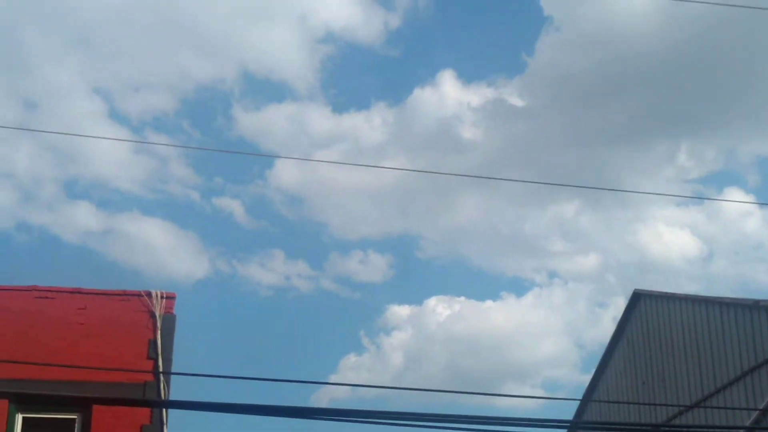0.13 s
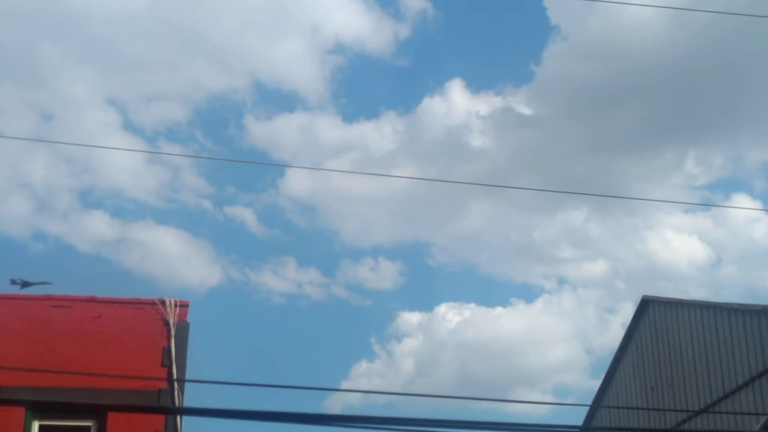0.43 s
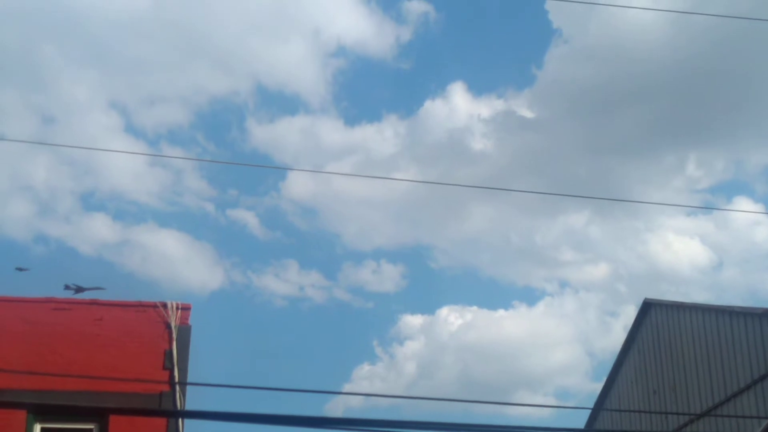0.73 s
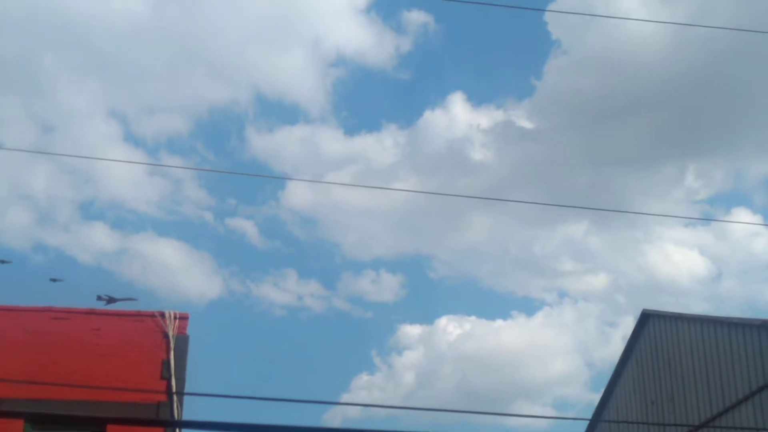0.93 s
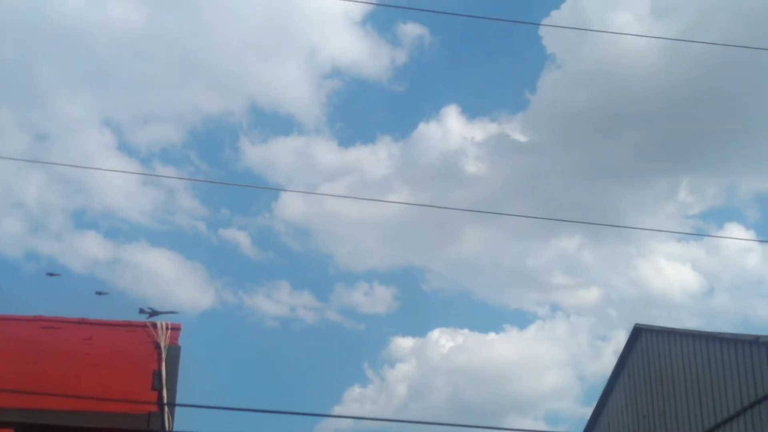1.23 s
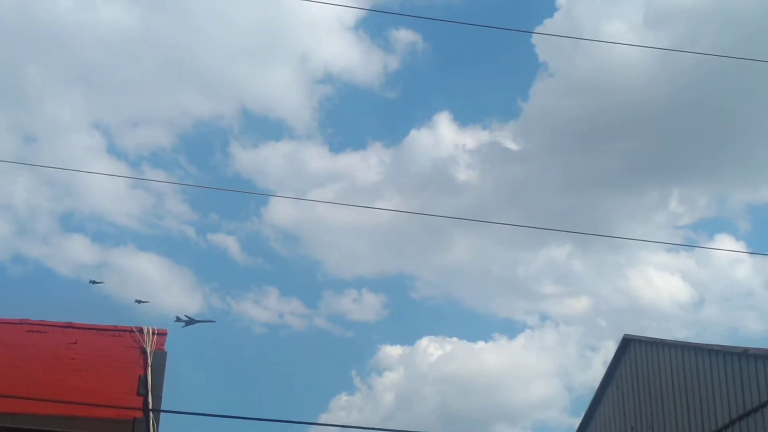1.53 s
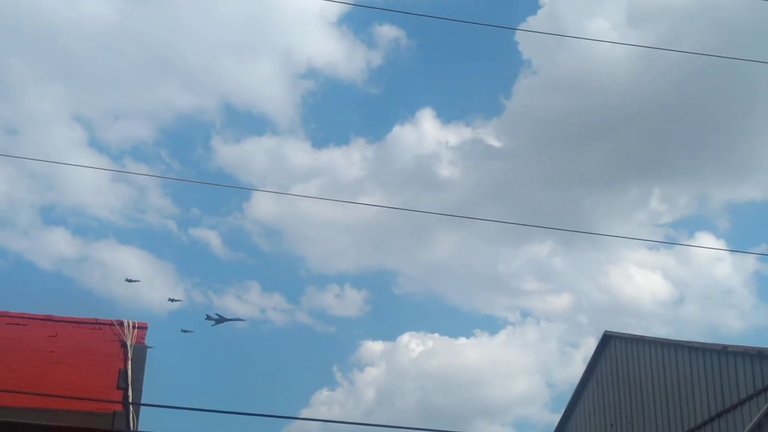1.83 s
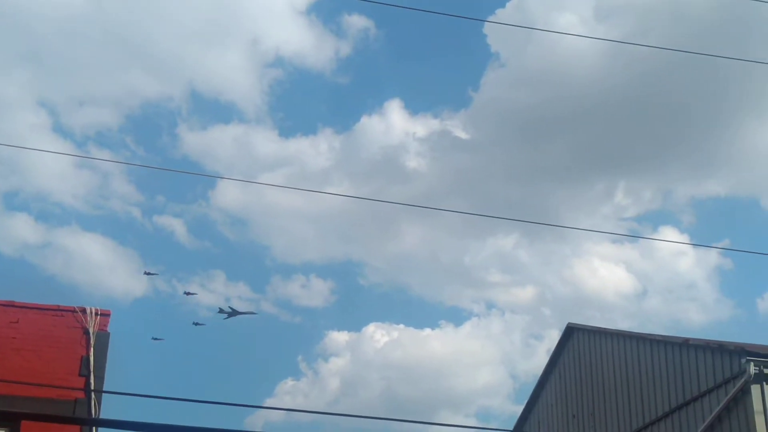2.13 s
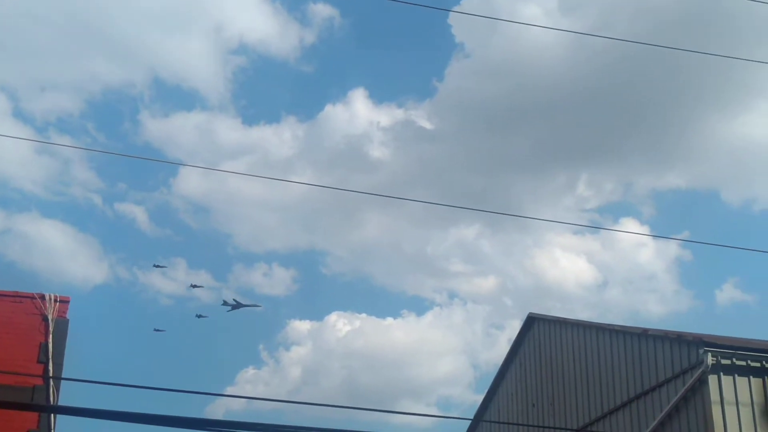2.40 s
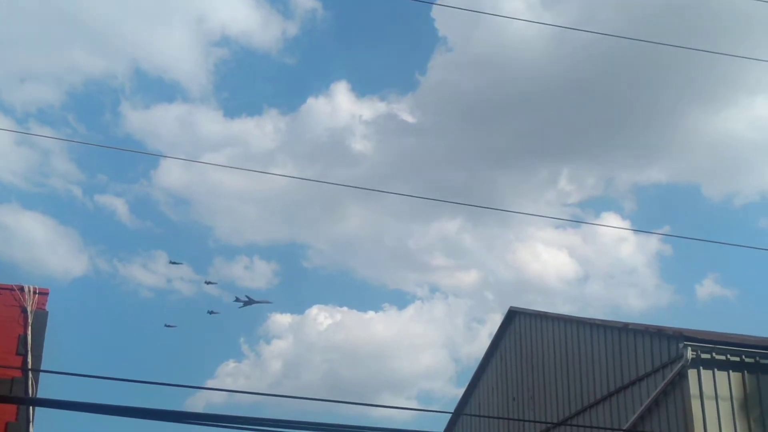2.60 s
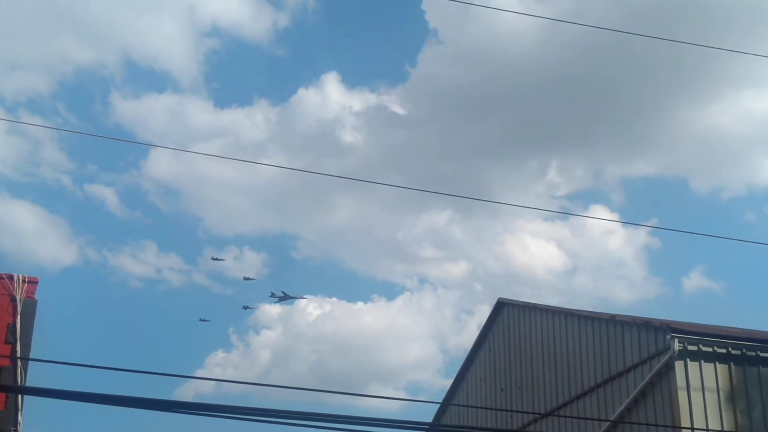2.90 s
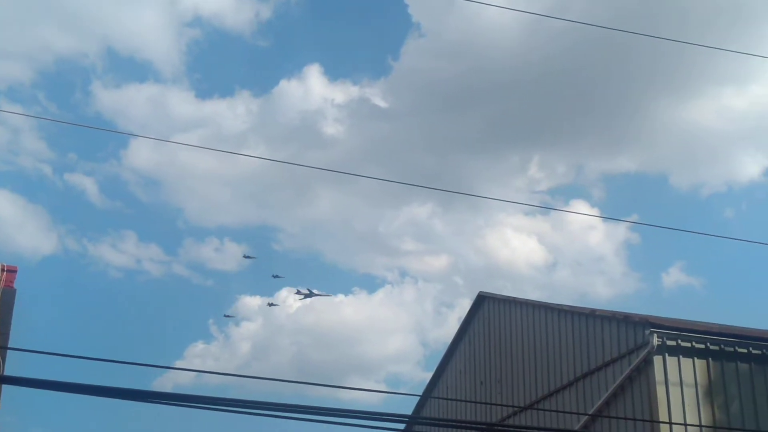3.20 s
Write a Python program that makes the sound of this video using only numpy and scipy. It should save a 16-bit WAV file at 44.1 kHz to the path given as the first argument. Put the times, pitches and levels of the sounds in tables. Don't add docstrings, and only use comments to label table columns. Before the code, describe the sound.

Jet aircraft rumble and roar some way off, growing unevenly stronger, with faint passing whines.

```python
import sys
import numpy as np
from scipy import signal
from scipy.fft import rfft, irfft
from scipy.io import wavfile

SR = 44100
rng = np.random.default_rng(int(sys.argv[2]) if len(sys.argv) > 2 else 0)


def generate_wav(signal):
    frames = np.transpose(np.atleast_2d(signal))
    scaled = np.clip(frames, -1, 1) * 32767
    pcm = np.round(scaled).astype(np.int16)
    wavfile.write(sys.argv[1], SR, pcm)


def level_to_linear(level):
    exponent = np.asarray(level, float) / 20
    return 10 ** exponent


N = 147735
T = np.arange(N) / SR
HZ = np.fft.rfftfreq(N, 1 / SR) + 1e-3


# (time [s], level [dB])
ROAR_LEVEL = [(0.03, -37.5), (0.15, -36), (0.33, -38.5), (0.51, -33), (0.71, -35), (0.84, -28),
              (0.98, -32.5), (1.0, -29), (1.15, -30.5), (1.84, -32.5), (2.03, -25.5), (2.04, -28),
              (2.38, -24.5), (2.42, -28.5), (2.48, -22.5), (2.65, -23.5), (2.67, -28.5), (3.32, -29.5)]


def roar_swell():
    level = np.interp(T, *np.transpose(ROAR_LEVEL))
    return level.mean(), level - level.mean()


# (frequency [Hz], density [dB per Hz])
ROAR_COLOUR = [(150, -7.5), (420, -1), (590, 2), (1100, -6.5), (2000, -6), (3000, -21.5), (4000, -38.5),
               (5600, -66)]
# (frequency [Hz], share of the swell [1])
SWELL_SHARE = [(300, 0.2), (700, 1.06), (1100, 1.27), (1600, 0.75), (3000, 0.76)]
# (centre [s], length [s], lift [dB])
CLEARINGS = [(.83, .12, 1), (1.972, 0.11, 2), (2.203, 0.076, 6.5), (2.45, 0.03, 4), (2.595, 0.04, 0),
             (2.89, 0.13, 3.5), (3.02, .1, 5.5), (3.118, 0.05, 4.5), (3.13, .2, 3), (3.27, .08, 2.5),
             (.5, .08, 1)]
# (frequency [Hz], share of the lift [1])
CLEARING_REACH = [(900, 0), (2000, 0.2), (3500, 1.5)]


def exhaust_roar(mean, swell, focus):
    clear = sum(db * bell(centre, length) ** 2 for centre, length, db in CLEARINGS)

    def band_level(hz):
        carried = mean + at_hz(SWELL_SHARE, hz) * swell
        return carried + at_hz(CLEARING_REACH, hz) * clear + focus(hz)

    return jet_noise(ROAR_COLOUR, band_level, flutter_db=1.0, patch_db=0.3)


# (frequency [Hz], density [dB per Hz])
RUMBLE_COLOUR = [(22, -59), (38, -37.5), (60, -5.5), (120, 0), (250, -0.5), (400, -11.5), (1000, -28),
                 (6000, -94)]
RUMBLE_DB, RUMBLE_FOLLOWS = -24, 0.13


def deep_rumble(swell, focus):
    def band_level(hz):
        return RUMBLE_DB + RUMBLE_FOLLOWS * swell + focus(hz)

    return jet_noise(RUMBLE_COLOUR, band_level, flutter_db=-0.06, patch_db=2.0)


# (frequency [Hz], share [1])
DIRECT_SHARE = [(60, 0.99), (250, 0.96), (600, 0.86), (1050, 0.44), (2000, 0.71), (3200, .55), (4500, 0.37)]


def jet_noise(colour, band_level, flutter_db, patch_db):
    white = rfft(rng.standard_normal((3, N)))
    share = np.clip(at_hz(DIRECT_SHARE, HZ), 0, 1)
    ports = at_ports(white[0], white[1:], share) * level_to_linear(at_hz(colour, HZ))
    ports = ports / np.sqrt(np.mean(irfft(ports, N) ** 2))
    together = flutter_db * drift(8.2)
    place = np.clip(2 * np.log2(HZ / 20), 0, 17)
    out = 0
    for k in range(18):
        band = np.clip(1 - abs(place - k), 0, 1)
        level = band_level(20 * 2 ** (k / 2)) + together + patch_db * drift(1.6)
        out = out + irfft(ports * band, N) * level_to_linear(level)
    return out


# (centre [s], length [s], frequency [Hz], lift [dB])
FOCUS = [(2.55, .24, 730, 2), (2.56, 0.13, 1330, 1.5), (.86, 0.1, 510, -2.5), (2.49, 0.31, 310, 2),
         (1.47, 0.18, 800, 1), (1.95, 0.21, 380, 3), (2.8, 0.21, 306, -2.5), (0.49, .3, 48, 7),
         (1.5, 0.17, 1400, -0.5), (0.31, 0.21, 820, -1.5), (2, .05, 860, -1), (3.25, 0.22, 830, -5),
         (3.2, .2, 320, -4), (1.48, 0.29, 194, -4.5), (1.95, 0.34, 1200, 4), (2.57, 0.065, 600, 3.5),
         (0.11, 0.17, 450, -2.5), (2.225, 0.24, 490, 0.5), (3.5, 0.18, 470, -2.5)]
FOCUS_OCTAVES = 0.52


def pitch_focus():
    lifts = np.array([db * bell(centre, length) for centre, length, _, db in FOCUS])
    centres_hz = np.array(FOCUS)[:, 2]

    def focus(hz):
        return np.exp(-(np.log2(hz / centres_hz) / FOCUS_OCTAVES) ** 2) @ lifts

    return focus


# (start [s], length [s], frequency [Hz], level [dB])
WHINES = [(.2, 0.2, 2870, -58.5), (.36, 0.14, 2810, -47), (.9, .15, 3130, -48.5), (1.051, .13, 3135, -45.5),
          (1.171, .13, 3080, -49), (1.606, 0.046, 2715, -41.5), (1.833, .12, 2735, -41.5),
          (2.1, .09, 2515, -41), (2.366, 0.088, 2620, -39), (2.422, 0.063, 2450, -42),
          (1.429, 0.15, 2590, -49.5), (1.527, 0.047, 3020, -49), (2.282, .06, 2710, -47),
          (1.324, 0.075, 2610, -49)]
WHINE_WIDTH_HZ, WHINE_SAG_HZ_PER_S = 25, 180


def fan_whines():
    out = 0
    for start, length, hz, db in WHINES:
        middle = start + length / 2
        blur = level_to_linear(3 * drift(WHINE_WIDTH_HZ)) * np.exp(0.7j * drift(WHINE_WIDTH_HZ))
        since = T - start - length / 2
        cycles = hz * since - WHINE_SAG_HZ_PER_S * since ** 2 / 2
        tone = blur * np.exp(2j * np.pi * cycles)
        out = out + level_to_linear(db) * bell(middle, length) * tone.real
    return irfft(at_ports(rfft(out), 0, 0.78), N)


def ground_echo(sky):
    return 0.16 * lagged(sky, 0.00311, 1270)


# (frequency [Hz], left minus right [dB])
SHADE = [(40, -.1), (120, -.2), (450, -.5), (1000, 1.8), (2200, 6), (3000, 4), (3500, .3)]
# (frequency [Hz], phase [rad])
PORT_PHASE = [(300, -0.04), (550, -0.76), (1000, 0.58), (1500, -2.5), (2000, -4.5), (2500, -6),
              (3200, -7.5), (4000, -9)]


def at_ports(direct, scattered, share):
    shade = level_to_linear(at_hz(SHADE, HZ) / 2)
    wave = np.array([np.exp(1j * at_hz(PORT_PHASE, HZ)), np.ones_like(HZ)])
    both = np.sqrt(share) * direct * wave + np.sqrt(1 - share) * scattered
    return both * [shade, 1 / shade]


# (frequency [Hz], density [dB per Hz])
HISS_COLOUR = [(2500, -8.5), (4500, -3.5), (6000, -8.5), (7500, -7.5), (9000, -11.5), (12800, -21),
               (13300, -23.5), (14200, -27.5)]
HISS_DB = -67.5
# (centre [s], length [s], frequency [Hz], level [dB])
RUSTLES = [
    (2.422, .004, 12700, -62),
    (2.422, .006, 4300, -68),
    (2.58, .3, 5000, -70),
    (2.87, .17, 6300, -68),
    (3.3, .16, 5100, -65),
]
RUSTLE_SPREAD = 0.15


def handset_noise():
    white = rfft(rng.standard_normal((2, N)))
    hiss_level = level_to_linear(HISS_DB + 0.5 * drift(12.0))
    hiss = irfft(white * level_to_linear(at_hz(HISS_COLOUR, HZ)) * (HZ > 2000), N)
    out = hiss_level * rms_one(hiss)
    for centre, length, hz, db in RUSTLES:
        band = np.exp(-(np.log(HZ / hz) / RUSTLE_SPREAD) ** 2)
        rub = irfft(rfft(rng.standard_normal((2, N))) * band, N)
        out = out + level_to_linear(db) * bell(centre, length) * rms_one(rub)
    return out


def widened(dry):
    return dry - 0.76 * lagged(dry[::-1], 21 / 44100, 8800)


# (frequency [Hz], level [dB])
BUZZ = [(6000, -101), (7000, -98), (10000, -104), (12000, -105), (13000, -106), (14000, -96)]
BUZZ_SIDE_DB = 2


def electronic_tones():
    side = level_to_linear(BUZZ_SIDE_DB) * np.array([[-1], [1]])
    return sum(level_to_linear(db) * (1 + side) * np.sin(2 * np.pi * hz * T) for hz, db in BUZZ)


def rms_one(x):
    return x / np.sqrt(np.mean(x ** 2) + 1e-20)


def at_hz(points, hz):
    table_hz, value = np.transpose(points)
    return np.interp(np.log(hz), np.log(table_hz), value)


def drift(rate):
    count = N // 32 + 2
    hz = np.fft.rfftfreq(count, 32 / SR)
    slow = irfft(rfft(rng.standard_normal(count)) / (1 + (hz / rate) ** 2), count)
    return np.interp(np.arange(N) / 32, np.arange(count), rms_one(slow))


def lagged(x, seconds, cut_hz):
    delay = np.exp(-2j * np.pi * HZ * seconds)
    return irfft(rfft(x) * delay / (1 + (HZ / cut_hz) ** 4), N)


def bell(centre, length):
    return np.cos(np.pi * np.clip((T - centre) / length, -0.5, 0.5))


def scene():
    mean, swell = roar_swell()
    focus = pitch_focus()
    sky = exhaust_roar(mean, swell, focus) + deep_rumble(swell, focus)
    return sky + ground_echo(sky) + fan_whines() + handset_noise()


def top_cut(x):
    return signal.sosfilt(signal.butter(12, 14200, fs=SR, output="sos"), x)


def record(dry):
    mix = widened(dry) + electronic_tones()
    return top_cut(mix)


dry = scene()
out = record(dry)
generate_wav(out)
```